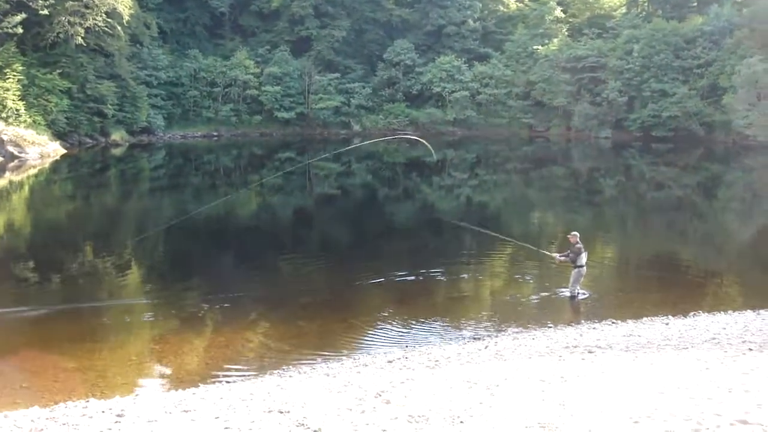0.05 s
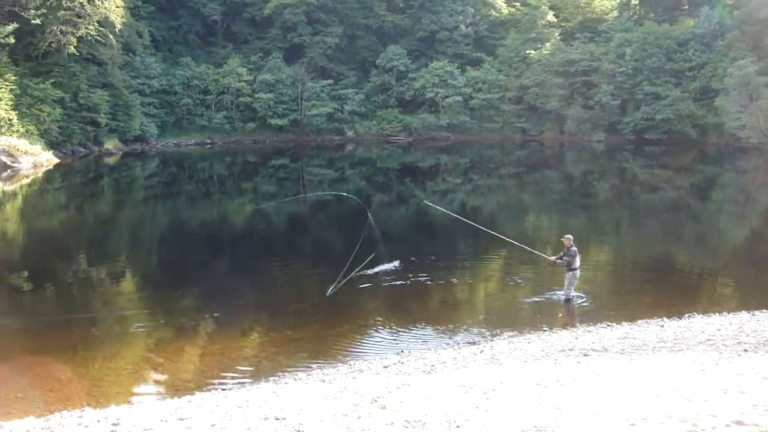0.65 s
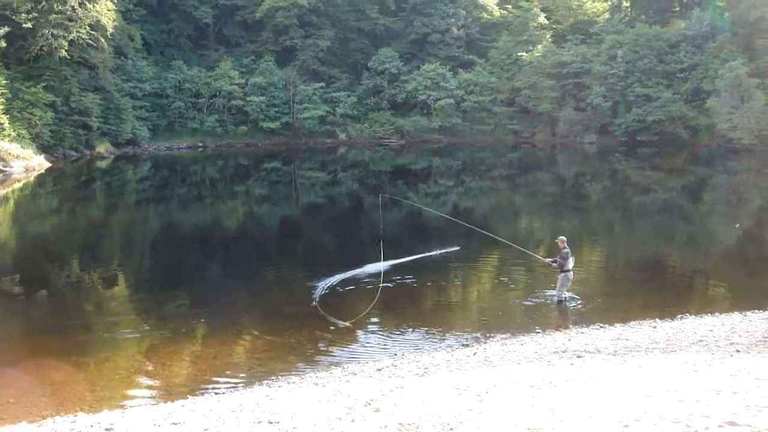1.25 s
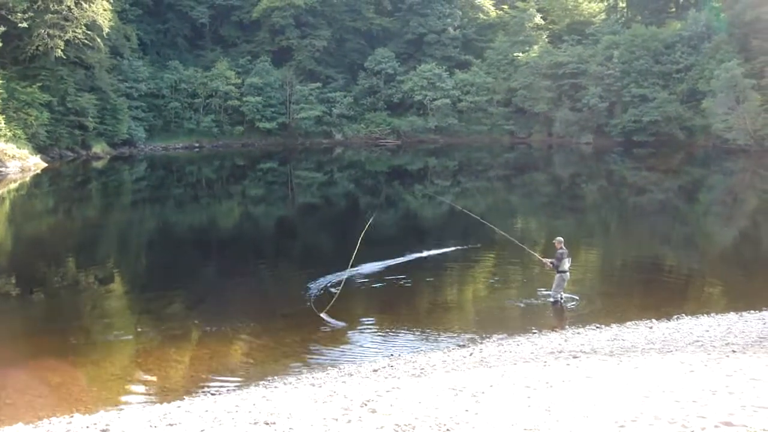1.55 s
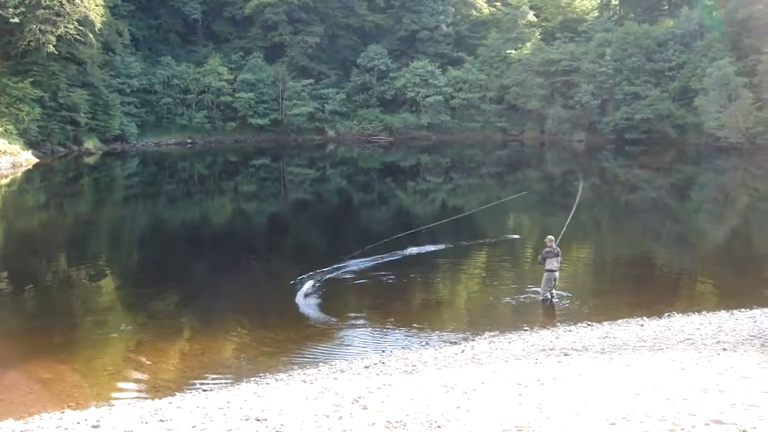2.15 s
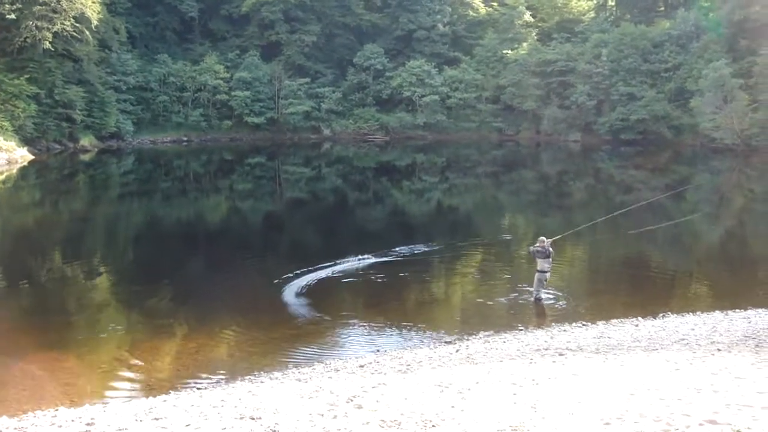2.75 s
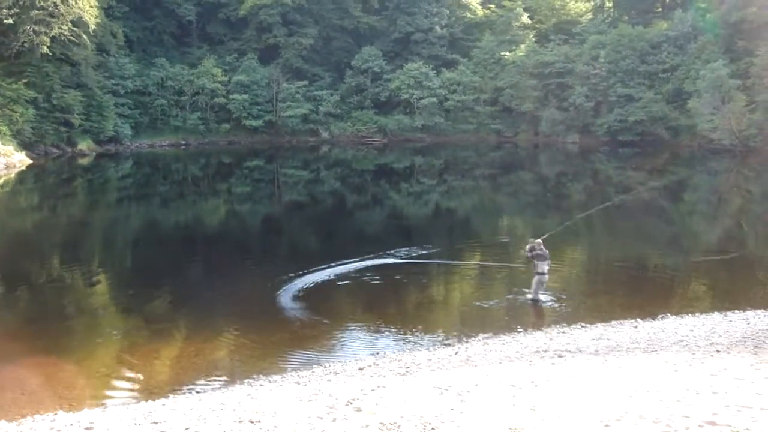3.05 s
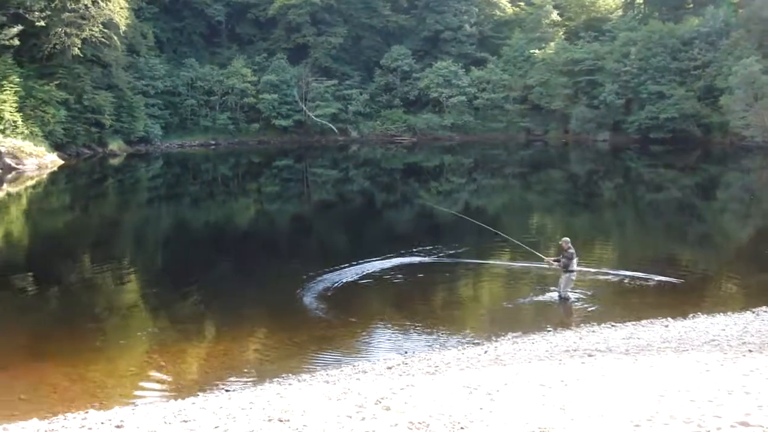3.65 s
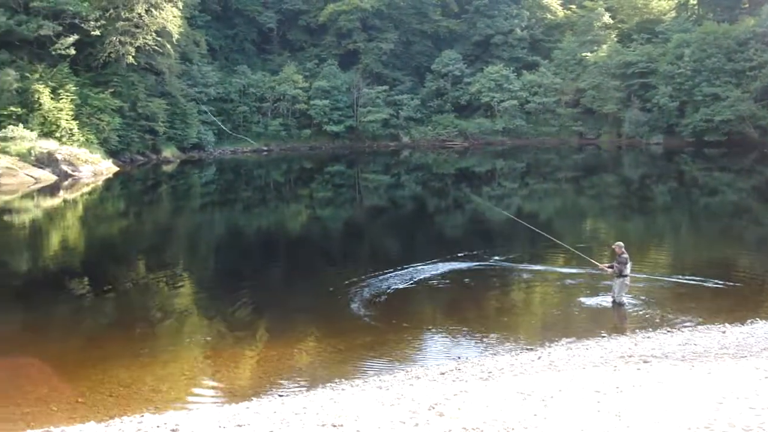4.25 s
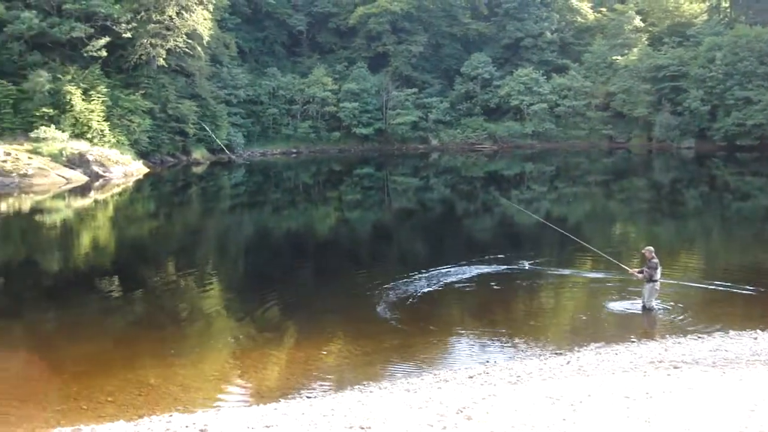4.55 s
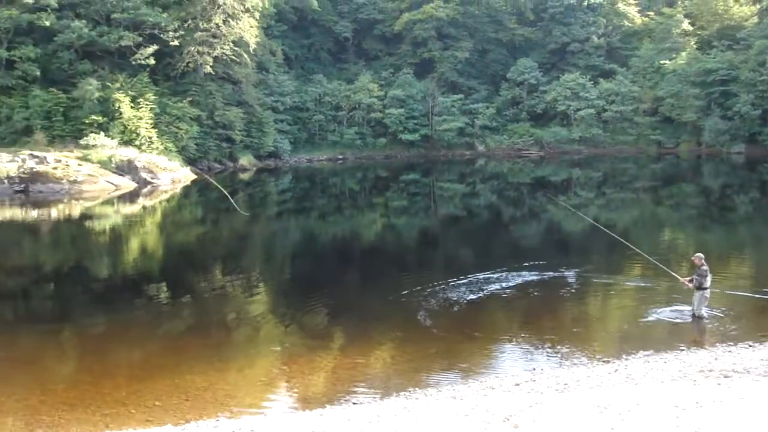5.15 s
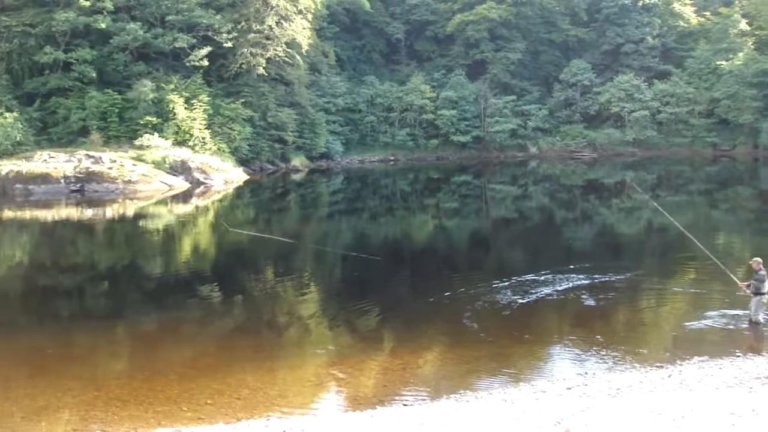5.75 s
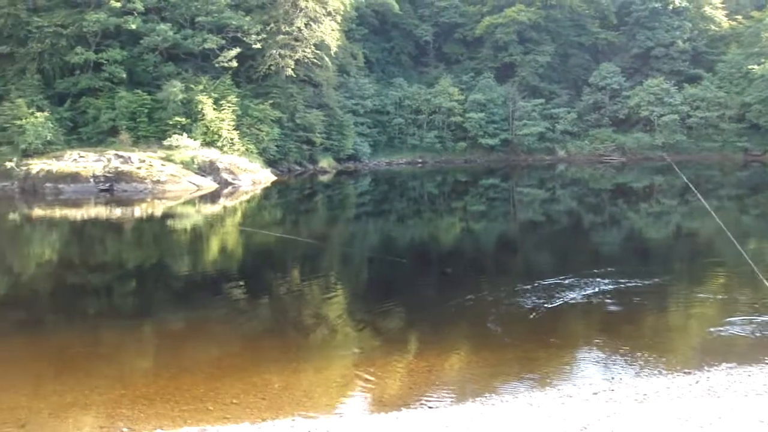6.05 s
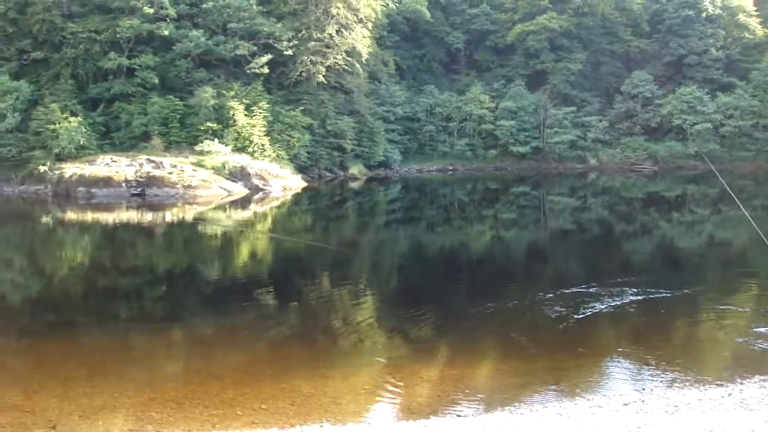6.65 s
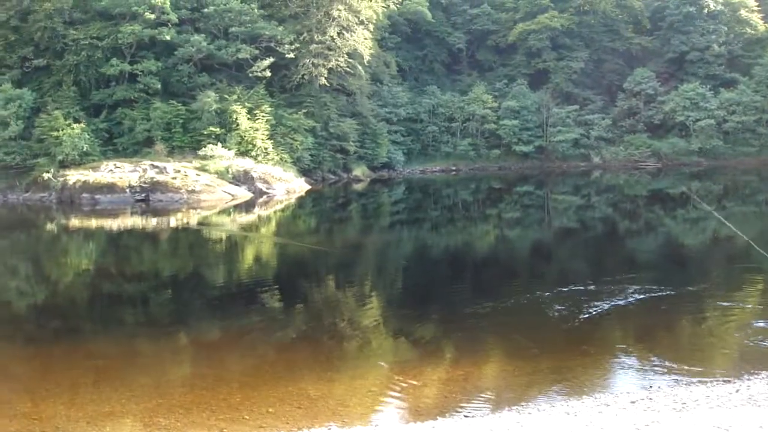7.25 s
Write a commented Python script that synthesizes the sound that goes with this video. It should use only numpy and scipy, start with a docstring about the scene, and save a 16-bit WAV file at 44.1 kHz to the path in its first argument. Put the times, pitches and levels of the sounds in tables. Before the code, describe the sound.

Over a far, even outdoor roar, a fly line rips off the water with pattering drops, followed by one quick rod swish.

```python
"""A far roar with a low drone lies over a wooded river pool; it holds steady, then slowly recedes.
Some way from the microphone an angler makes one long fly cast. The line peels off the water in a
hiss of spray and ringing drops, rod and line whoosh as they shed eddies in the air, and the line
ticks against the rod and shoots out through the rings. Near the end a far bird gives a few faint
chips. The trees on the banks add a short echo to angler and bird."""
import sys
import numpy as np
from scipy import signal
from scipy.fft import rfft, irfft, next_fast_len
from scipy.io import wavfile
from scipy.ndimage import uniform_filter1d

SR = 44100
rng = np.random.default_rng(int(sys.argv[2]) if len(sys.argv) > 2 else 0)


def log_audio(samples):
    """Write samples as a 16-bit WAV file to the path given in sys.argv[1]."""
    # one column per channel
    frames = np.atleast_2d(samples).T
    # limit to full scale, then quantise
    limited = np.clip(frames, -1, 1)
    pcm = np.round(limited * 32767).astype(np.int16)
    wavfile.write(sys.argv[1], SR, pcm)


N = 325899
TIME = np.arange(N) / SR


def amp(db):
    """Decibels to gain."""
    return 10 ** (np.asarray(db) / 20)


def unit(x):
    """Scales to rms 1."""
    return x / np.sqrt(np.mean(x ** 2) + 1e-20)


def read(points, hz):
    """Reads a curve of (frequency, value) points on a log-frequency axis."""
    freqs, values = np.transpose(points)
    return np.interp(np.log(hz + 1), np.log(freqs + 1), values)


def colour(x, points):
    """Filters x by a curve of (freq_hz, level_db) points, at rms 1."""
    size = next_fast_len(len(x))
    gain = amp(read(points, np.fft.rfftfreq(size, 1 / SR)))
    return unit(irfft(rfft(x, size) * gain, size)[:len(x)])


def wander(size, width_hz):
    """Complex noise of power near 1 that changes about width_hz times a second."""
    hz = np.fft.fftfreq(next_fast_len(size + 4096), 1 / SR)
    white = rng.standard_normal((len(hz), 2)) @ [1, 1j]
    slow = np.fft.ifft(np.fft.fft(white) * np.exp(-(hz / width_hz) ** 2))
    return slow[:size] / np.sqrt(np.mean(abs(slow) ** 2))


def add(mix, start_s, sound):
    """Mixes a sound in at start_s."""
    part = mix[max(round(start_s * SR), 0):][:len(sound)]
    part += sound[:len(part)]


def fuzzy_tone(t, hz, db, spread, evenness, hiss_db=None):
    """A noise band of relative width spread around a pitch, like the eddies shed by a moving rod."""
    turns = np.cumsum(hz) / SR
    # the eddies lose step after a set number of cycles, so the band widens as the pitch climbs
    eddies = np.interp(turns * SR / hz.mean(), np.arange(len(t)), wander(len(t), spread * hz.mean()))
    eddies /= (abs(eddies) + .17) ** evenness
    tone = unit((eddies * np.exp(2j * np.pi * turns)).real)
    if hiss_db is not None:  # the turbulent wake hisses more at speed
        wake = [(100, -35), (300, -14), (600, -2), (1800, 6), (3200, 1), (7000, -13), (11000, -16)]
        tone += amp(hiss_db) * hz / hz.max() * colour(rng.standard_normal(len(t)), wake)
    out = np.zeros(N)
    add(out, t[0], amp(db) * tone * signal.windows.tukey(len(t), .02))
    return out


def far_roar(recede_at_s=3.0, sink_db_per_s2=.1, dull_db_per_oct_s=.2, drone_fade_db_per_s=2.6):
    """A distant roar holds, then sinks ever faster and dulls; its drone fades, a low rumble stays."""
    # spectrum of the roar: freq_hz, relative_db
    roar_spectrum = [(88, -41), (160, -23), (230, -10.5), (315, -9.3), (450, -12.3), (630, -2.5),
                     (850, 1.5), (1100, .5), (1400, -4), (2100, -8), (3300, -18.5), (4300, -26.5),
                     (6800, -32), (10800, -35), (14000, -64)]
    # spectrum of the rumble beneath it: freq_hz, relative_db
    rumble_spectrum = [(20, -32), (35, -18), (55, -5), (80, -1), (125, 1.5), (165, 0.5), (230, -12),
                       (400, -50)]
    frames, hz = N // 256 + 5, np.fft.rfftfreq(1024, 1 / SR)
    real, imag, patches = rng.standard_normal((3, frames, len(hz)))
    patches = uniform_filter1d(patches, size=14, axis=0)
    patches_db = .43 * unit(uniform_filter1d(patches, size=12, axis=1))
    receding_s = np.maximum(np.arange(frames)[:, None] * 256 / SR - recede_at_s, 0)
    level_db = 2 - sink_db_per_s2 * receding_s ** 2
    octaves = np.log2(np.clip(hz, 400, 3000) / 900)
    tilt_db = (.45 - dull_db_per_oct_s * receding_s) * octaves
    drift_share = np.interp(hz, [4000, 7000], [1, .2])  # the top hiss hardly drifts
    field_db = read(roar_spectrum, hz) + drift_share * (level_db + tilt_db) + patches_db
    roar = signal.istft(((real + 1j * imag) * amp(field_db)).T, nperseg=1024, noverlap=768)[1][:N]
    rumble = colour(rng.standard_normal(N), rumble_spectrum)
    drone_db = -71 - drone_fade_db_per_s * np.maximum(TIME - recede_at_s, 0)
    drone = fuzzy_tone(TIME, hz=np.full(N, 77), db=drone_db, spread=.046, evenness=.4)
    return amp(-37.7) * unit(roar) + amp(-69.7) * rumble + drone


def ticks(rows, spread, gain_db, splash_db=1, rise_s=.0012):
    """Each small impact is a short, pitched burst with a splash of noise around that pitch."""
    out, t = np.zeros(N), np.arange(2048) / SR
    for start_s, db, hz, t60_s in rows:
        body = np.cos(2 * np.pi * hz * t + 1.1 * unit(wander(len(t), spread * hz).real))
        splash_spectrum = [(hz / 3, -22), (.55 * hz, 0), (1.17 * hz, 0), (1.8 * hz, -20), (4 * hz, -38)]
        splash = colour(rng.standard_normal(len(t)), splash_spectrum)
        envelope = amp(db + gain_db - 60 * t / t60_s) * (1 - np.exp(-t / rise_s))
        add(out, start_s, envelope * (body + amp(splash_db) * splash))
    return out


def single_drops():
    """Loud single drops and ticks of line strike the pool and ring briefly."""
    # impacts on the water: start_s, relative_db, pitch_hz, t60_s
    drops = [ (1.2448, -26.5, 3100, .016), (1.2458, -45, 6400, .02), (1.873, -35, 3500, .016),
             (1.926, -27.5, 2550, .04), (1.959, -31, 2700, .022), (1.9885, -29.5, 2850, .026),
             (2.006, -28.5, 2750, .026), (2.027, -30, 3700, .026), (2.048, -29, 3400, .024),
             (2.084, -25, 2750, .018), (2.1055, -27.5, 3600, .018), (2.127, -30, 3500, .018),
             (2.161, -29, 3800, .02), (2.168, -27.5, 3600, .026), (2.1965, -29, 3900, .026),
             (2.2156, -30, 3700, .02), (2.2485, -35.5, 6600, .015), (2.275, -19, 3000, .02),
             (2.2835, -37, 7000, .014), (2.287, -30, 3100, .02), (2.297, -30, 2900, .03),
             (2.3066, -35.5, 6600, .015), (2.308, -30, 2550, .018), (2.3283, -34.5, 6800, .015),
             (2.3525, -27.5, 2400, .03), (2.3572, -36, 7200, .014), (2.3615, -29.5, 2750, .02),
             (2.3826, -35, 7000, .015), (2.4034, -36.5, 6600, .015), (2.4213, -35.5, 6300, .016),
             (2.4426, -34, 6200, .026), (2.457, -28.5, 2700, .02), (2.472, -24, 2250, .032),
             (2.479, -34.5, 6600, .015), (2.4994, -35, 6300, .016), (2.578, -37, 7800, .016),
             (2.688, -37.5, 6500, .018), (2.7272, -31, 3900, .026), (2.8227, -42, 5400, .018),
             (2.87, -46, 5200, .016), (2.906, -42.5, 5000, .03), (2.9645, -42, 7200, .016),
             (3.089, -46.5, 6000, .024), (3.1245, -44.5, 8000, .018), (7.2399, -39, 3300, .022), ]
    return ticks(drops, spread=.22, gain_db=-4.3)


def droplets(spectrum, per_s, scatter_db, cycles):
    """A rain of tiny impacts of scattered size, each ringing a few cycles at its own pitch."""
    hits = np.flatnonzero(rng.random(N) < per_s / SR)
    size_draw, pitch_draw, sign_draw = rng.random((len(hits), 3)).T[:, :, None]
    sizes = amp(scatter_db * np.minimum(-np.log(1 - size_draw), 4))
    hz, taps = 1500 * 8 ** pitch_draw, np.arange(200)
    turns = hz * taps / SR
    rings = sizes * hz * np.exp(-turns / cycles) * np.sin(2 * np.pi * turns) * np.sign(sign_draw - .5)
    rain = np.bincount((hits[:, None] + taps).ravel(), rings.ravel(), N)[:N]
    return colour(rain, spectrum)


def spray(crest, level_db, build_db, thin_db, fall_db, clear_s=.09, settle_db_per_s=15):
    """Gain of one size of drop: in each pull it builds and thins, then settles with the line clear."""
    # pulls on the line, the long sweep back and the forward cast: start_s, length_s, relative_db
    pulls = [(1.65, 1.05, 0), (3.25, .45, -17)]
    gain = np.zeros(N)
    for start_s, length_s, pull_db in pulls:
        # crest is a share of the pull; build_db and thin_db are slopes per whole pull
        progress = np.minimum((TIME - start_s) / length_s, 1)
        pulling_db = np.minimum(build_db * (progress - crest), thin_db * (crest - progress))
        # the spray drops quickly, then what is in the air patters back
        after_s = np.maximum(TIME - start_s - length_s, 0)
        settling_db = fall_db * np.minimum(after_s / clear_s, 1) - settle_db_per_s * after_s
        gain += amp(level_db + pull_db + pulling_db + settling_db) * np.clip(10 * progress, 0, 1)
    return gain


def peel(flutter_db=-.2):
    """The line tears out of the surface: coarse drops first, then finer drops and mist as it speeds up."""
    # spectra of the three sizes of drop: freq_hz, relative_db
    coarse_spectrum = [(600, -35), (1500, -7), (2400, 7), (4300, -1.5), (5300, -6.5), (7000, -30),
                       (11000, -37)]
    fine_spectrum = [(1500, -35), (3500, -21), (5000, -1.5), (6300, 5), (8000, -.5), (11000, -11)]
    mist_spectrum = [(3000, -30), (6500, -8), (8500, -2), (10000, 3), (11000, -4)]
    coarse = droplets(coarse_spectrum, per_s=1700, scatter_db=3.2, cycles=2.5)
    coarse *= spray(crest=.39, level_db=-43, build_db=43, thin_db=6, fall_db=-7.5)
    fine = droplets(fine_spectrum, per_s=4500, scatter_db=4.0, cycles=2.6)
    fine *= spray(crest=.7, level_db=-51, build_db=32, thin_db=21, fall_db=-10)
    mist = droplets(mist_spectrum, per_s=6300, scatter_db=1.5, cycles=2.8)
    mist *= spray(crest=.71, level_db=-55, build_db=34, thin_db=2, fall_db=-12)
    return (coarse + fine + mist) * amp(flutter_db * unit(wander(N, width_hz=45).real))


def swish(*names, spread, evenness, hiss_db=None, pitch_ratio=1, gain_db=0, swell_power=1.1):
    """Each named stroke swells and dies in an arch while its pitch glides with its speed."""
    # strokes of rod and line through the air, by name:
    # start_s, loudest_s, end_s, start_hz, loudest_hz, end_hz, level_db
    strokes = { "lift": (3.08, 3.108, 3.135, 460, 590, 820, -38.3),
               "butt": (3.338, 3.358, 3.378, 500, 465, 440, -38),
               "shaft": (3.357, 3.399, 3.46, 590, 540, 450, -31.4),
               "mid rod": (3.385, 3.43, 3.455, 620, 820, 940, -35.2),
               "upper rod": (3.418, 3.446, 3.472, 1000, 1070, 1080, -33.3),
               "top section": (3.418, 3.445, 3.475, 1250, 1410, 1560, -34.2),
               "tip": (3.446, 3.471, 3.498, 1700, 2240, 2800, -30.1),
               "loop": (3.508, 3.533, 3.58, 2150, 1880, 1500, -40.5),
               "loop unrolling": (3.58, 3.643, 3.70, 1550, 1380, 1250, -41.8),
               "shoot": (3.795, 3.865, 3.91, 6700, 8900, 9800, -67),
               "shoot running": (3.865, 3.925, 4.0, 9500, 9750, 9800, -67),
               "shoot slowing": (4.07, 4.14, 4.22, 10100, 9500, 8800, -71.5), }
    out = np.zeros(N)
    for name in names:
        start_s, loudest_s, end_s, *pitches_hz, level_db = strokes[name]
        t = np.arange(start_s, end_s, 1 / SR)
        progress = np.interp(t, [start_s, loudest_s, end_s], [0, .5, 1])
        hz = pitch_ratio * np.exp(np.interp(progress, [0, .5, 1], np.log(pitches_hz)))
        swell_db = swell_power * 20 * np.log10(np.sin(np.pi * progress) + 1e-6)
        out += fuzzy_tone(t, hz, level_db + gain_db + swell_db, spread, evenness, hiss_db)
    return out


def cast(flutter_db=.9):
    """The thick shaft hums low and each thinner section sings higher, up to the whip of the tip."""
    lift = swish("lift", spread=.11, evenness=.6)
    shaft = swish("butt", "shaft", spread=.13, evenness=.6, hiss_db=-20)
    upper = swish("mid rod", "upper rod", "top section", spread=.13, evenness=.6, hiss_db=-14.5)
    tip = swish("tip", spread=.21, evenness=.5, hiss_db=-8)
    # just below the tip the rod is thicker and slower, so it sings lower
    below_tip = swish("tip", spread=.2, evenness=.39, pitch_ratio=.62, gain_db=-5.5)
    # the slowing loop falls in pitch, then line whistles out through the rings
    loop = swish("loop", "loop unrolling", spread=.19, evenness=.5)
    shoot = swish("shoot", "shoot running", "shoot slowing", spread=.065, evenness=.3)
    flutter = amp(flutter_db * unit(wander(N, width_hz=90).real))  # the wake breaks up in lumps
    return lift + flutter * (shaft + upper + tip + below_tip) + loop + shoot


def line_slaps(t60_s=.032):
    """The line slaps the rod in light, high ticks."""
    # impacts on the rod: start_s, relative_db, pitch_hz
    slaps = [(3.632, -43.5, 6000), (3.6936, -50, 6100), (3.776, -45.5, 8100), (3.8025, -46.5, 8800),
             (3.886, -47, 5300), (4.016, -51, 5800), (5.79, -49.5, 6450), (6.133, -54, 10000)]
    return ticks([(*row, t60_s) for row in slaps], spread=.2, gain_db=-4.2)


def bird(length_s=.035):
    """A far bird gives short, hoarse chips that arch in pitch and level."""
    # the bird's chips: start_s, relative_db, top_pitch_hz
    chips = [(6.84, -57.5, 3700), (6.861, -53, 3680), (6.946, -56, 3720), (7.075, -59.5, 3680)]
    out = np.zeros(N)
    arch = np.sin(np.pi * np.linspace(0, 1, int(length_s * SR)))
    for start_s, db, hz in chips:
        turns = np.cumsum(hz * (1 - .05 * (1 - arch))) / SR
        hoarse_tone = 2 * (wander(len(arch), width_hz=330) * np.exp(2j * np.pi * turns)).real
        add(out, start_s, amp(db) * arch * hoarse_tone)
    return out


def banks(x, build_s=.06):
    """The trees on the banks scatter a short tail back to the microphone."""
    # decay of the echo: freq_hz, t60_s
    decay = [(300, 0.32), (2000, 0.36), (10000, 0.36)]
    hz, t, bands = signal.stft(rng.standard_normal(SR), SR, nperseg=256)
    bands *= amp(-60 * t / read(decay, hz)[:, None]) * np.minimum(t / build_s, 1)
    tail = signal.istft(bands, SR, nperseg=256)[1]
    return signal.fftconvolve(x, tail / np.linalg.norm(tail))[:N]


def scene():
    """One microphone by the pool: the angler some way off, the bird and the roar far behind."""
    angler = single_drops() + line_slaps() + cast() + peel()
    chips = amp(-2.3) * bird()
    echo = banks(amp(-17) * angler + amp(-7) * chips)  # the bird is among the trees, so more echo
    return (angler + chips + echo + far_roar())[None]


def record(dry, edge_hz=11020):
    """The recorder's band limit cuts the top treble."""
    lowpass = signal.firwin(601, edge_hz, window=("kaiser", 9), fs=SR)
    return signal.oaconvolve(dry, lowpass[None], "same")


dry = scene()
out = record(dry)
log_audio(out)
```